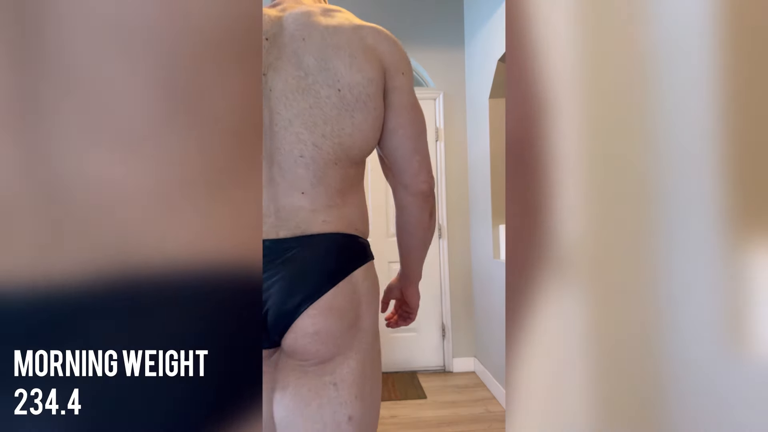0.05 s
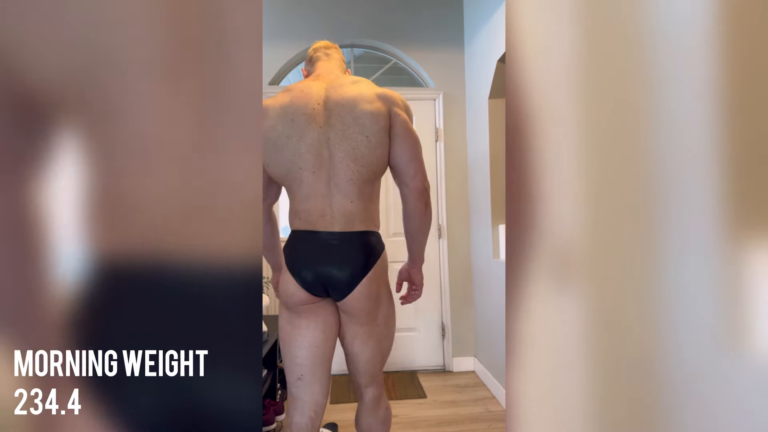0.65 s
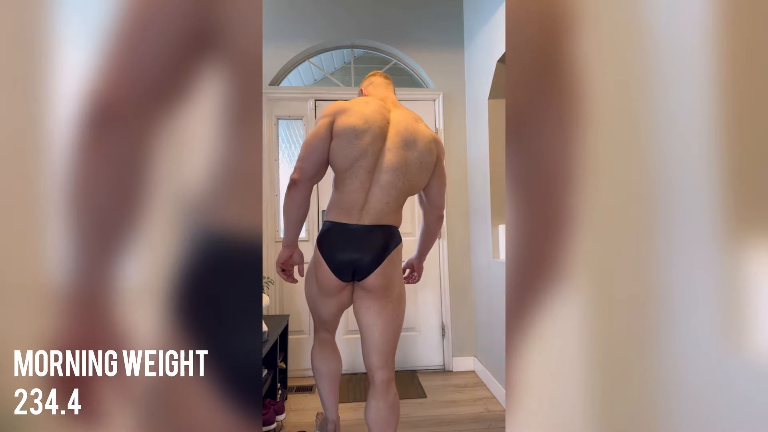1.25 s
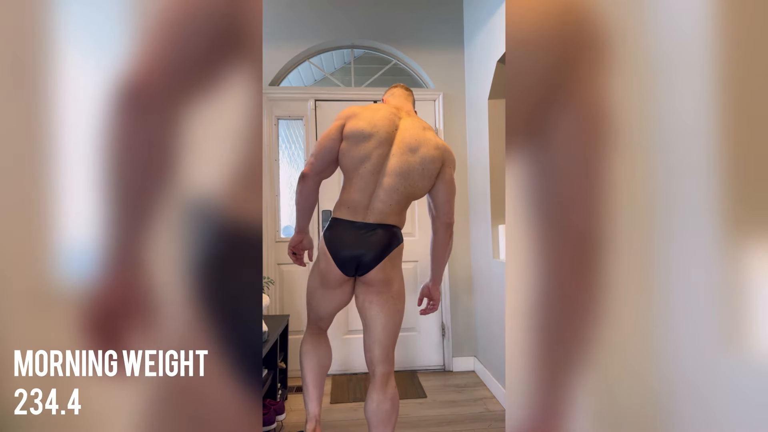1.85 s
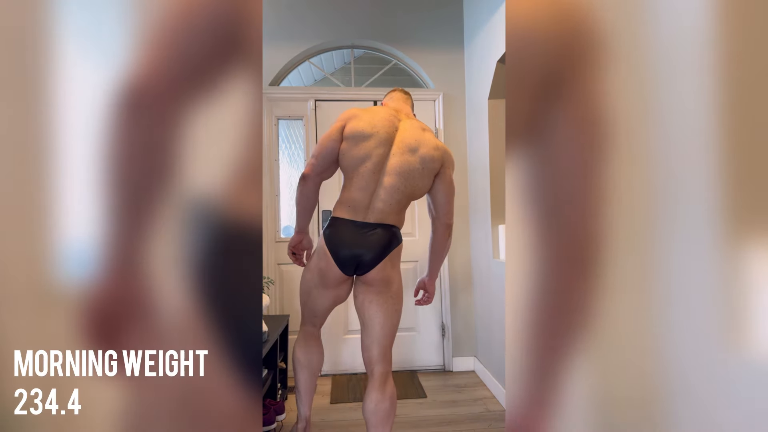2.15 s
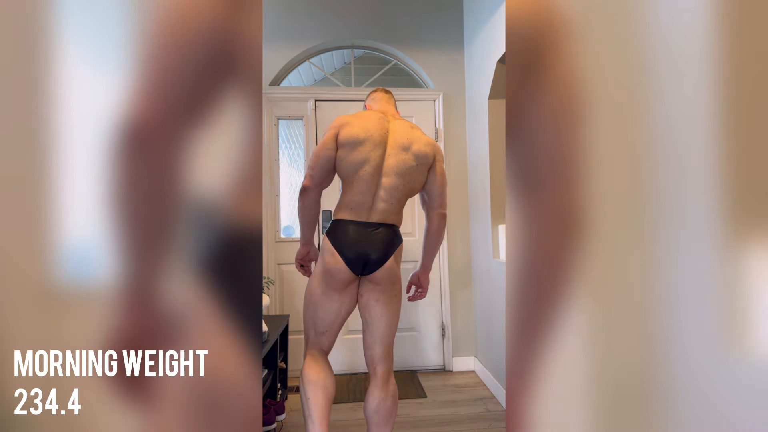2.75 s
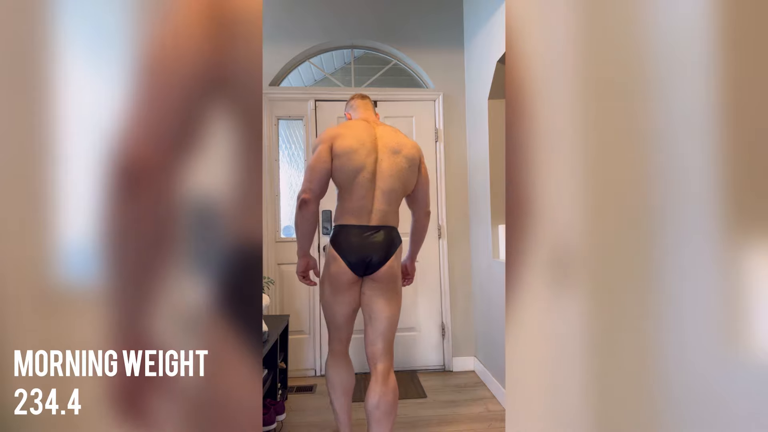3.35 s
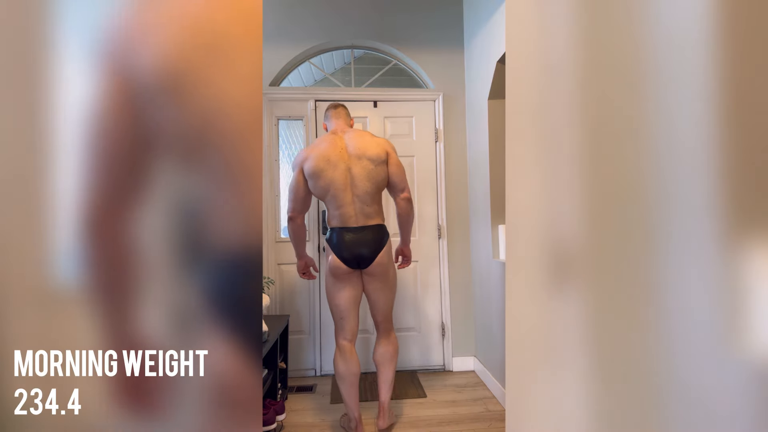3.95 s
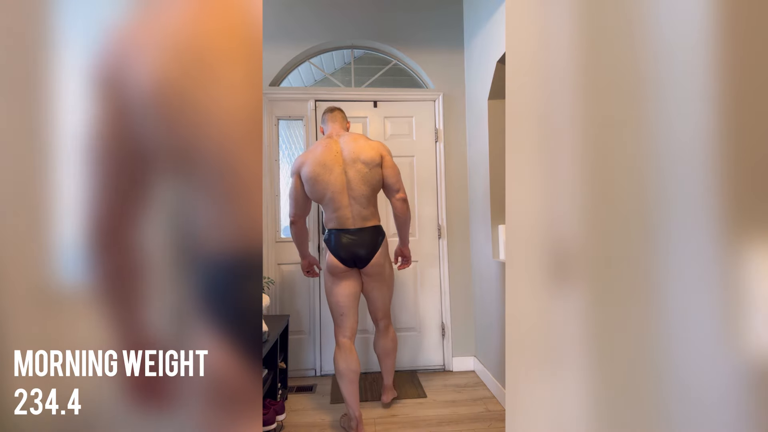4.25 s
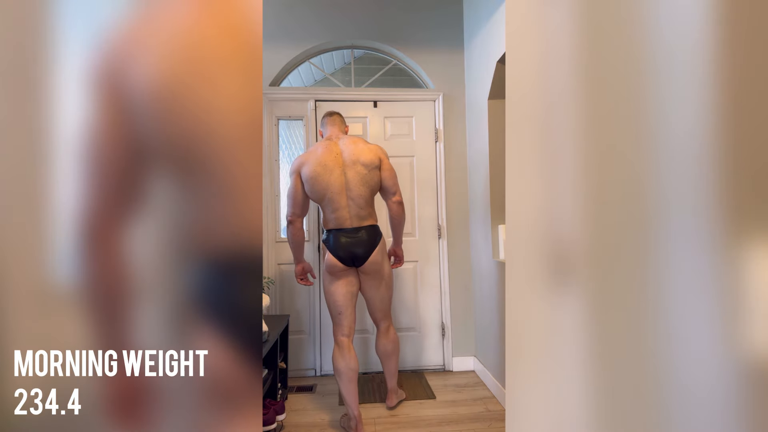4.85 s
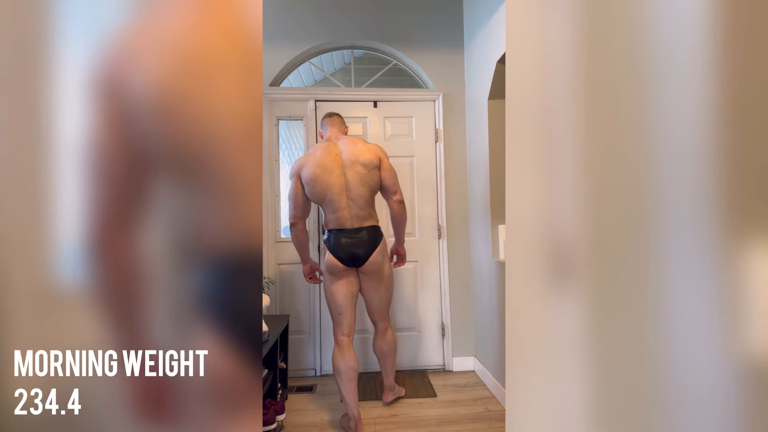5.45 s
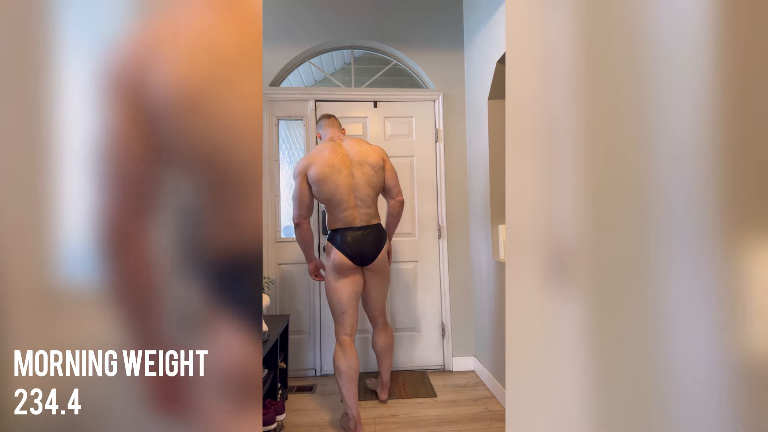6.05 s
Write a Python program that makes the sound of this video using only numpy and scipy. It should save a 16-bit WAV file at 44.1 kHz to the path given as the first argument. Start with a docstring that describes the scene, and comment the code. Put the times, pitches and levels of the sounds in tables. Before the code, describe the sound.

In a small, quiet entrance hall, bare feet step softly on a wooden floor while skin rubs close to the microphone. Soles brush and hiss over the boards between dull footfalls, and loose boards give short hollow notes. After a quick cluster of steps comes a louder sliding swish, then two short sweeps that each end on a planted heel, the second a firm stamp.

```python
"""A small entrance hall with a wooden floor, where someone walks barefoot and shuffles into a stance.
Skin rubs close to the microphone at first; soles brush and slide on the boards, and each footfall
slaps, knocks and sets the floor booming. Loose boards sound under the weight, skin ticks as it peels
away. Two slides end in a planted heel, the second a firm stamp. Behind it all is the house's still air."""
import sys
import numpy as np
from scipy import signal
from scipy.io import wavfile
from scipy.ndimage import uniform_filter1d

SR = 44100
rng = np.random.default_rng(int(sys.argv[2]) if len(sys.argv) > 2 else 0)


def transcribe(signal):
    """Save signal, clipped to [-1, 1], as a 16-bit WAV file at the path in sys.argv[1]."""
    frames = np.atleast_2d(signal).T
    limited = np.clip(frames, -1, 1)
    pcm = np.round(limited * 32767).astype(np.int16)
    wavfile.write(sys.argv[1], SR, pcm)


N = 272979
TIME = np.arange(N) / SR
EDGES = 31 * 2 ** (np.arange(28) / 3)   # third octaves, Hz
CENTRES = np.sqrt(EDGES[1:] * EDGES[:-1])
BANK = [signal.butter(2, pair, "band", fs=SR, output="sos") for pair in zip(EDGES, EDGES[1:])]
SPEED_POWER, SWEEP_POWER = 1.72, 2.73   # rubbing grows louder as a power of its speed

# The ring of the hall. Each row: frequency in Hz, seconds to die away by 60 dB.
HALL_T60 = [(60, 0.61), (150, 0.41), (600, 0.47), (2200, 0.4), (4000, 0.31), (6000, 0.27), (11000, 0.21)]
# A foot sweeps in ever faster and stops on its heel. Each row: landing in seconds, levels of thud,
# knock, slap and sweep in dB, the sweep's swell and hold in seconds.
HEEL_PLANTS = [(5.106, -47.5, -44.5, -42.5, -44, 0.37, 0.0033),
               (5.446, -33.5, -40.5, -35.5, -41, 0.13, 0.037)]


def from_db(db):
    """Decibels to gain."""
    return 10 ** (np.asarray(db) / 20)


def unit_rms(x):
    """Scale to rms 1."""
    return x / np.sqrt(np.mean(x ** 2) + 1e-20)


def at_hz(points, hz):
    """Read a table on a log-frequency axis."""
    f, value = np.transpose(points)
    return np.interp(np.log(hz), np.log(f), value)


def add(out, s, sound):
    """Mix a sound in at a given second."""
    start = max(round(s * SR), 0)
    out[start:start + len(sound)] += sound[:N - start]


def drift(rate_hz):
    """A smooth random wander with spread 1."""
    hop = 40
    pole = np.exp(-2 * np.pi * hop * rate_hz / SR)
    white = rng.standard_normal(N // hop + 2002)
    slow = signal.lfilter([1], [1, -2 * pole, pole * pole], white)[2000:]
    return np.interp(np.arange(N) / hop, np.arange(len(slow)), unit_rms(slow))


def shares(spectrum):
    """Rms of each third octave for a sound of rms 1; steep skirts beyond the table's ends."""
    octaves_beyond = np.abs(np.log2(CENTRES / np.clip(CENTRES, spectrum[0][0], spectrum[-1][0])))
    share = from_db(at_hz(spectrum, CENTRES) - 36 * octaves_beyond) * np.sqrt(CENTRES)
    return share / np.linalg.norm(share)


def friction(spectrum, grain_db, patchy_db):
    """Countless tiny uneven slips, coloured band by band as the contact patch changes; rms 1."""
    slips = rng.standard_normal((2, N)) * from_db(grain_db * np.clip(drift(120), -2, 2))
    out = np.zeros(N)
    for k, share in enumerate(shares(spectrum)):
        if share > 1e-3:
            band = unit_rms(signal.sosfilt(BANK[k], slips[k % 2]))
            out += share * band * from_db(patchy_db * drift(14.2))
    return unit_rms(out)


def stroke(start_s, swell_s, hold_s, fade_s, power):
    """Gain of one rubbing movement: the speed ramps up, holds and ramps down to rest."""
    speeding_up = (TIME - start_s) / swell_s
    slowing = 1 - (TIME - start_s - swell_s - hold_s) / fade_s
    return np.clip(np.minimum(speeding_up, slowing), 0, 1) ** power


def strokes(rows, power):
    """Gain of several movements, whose energies add."""
    return np.sqrt(sum((from_db(db) * stroke(*shape, power)) ** 2 for *shape, db in rows))


def burst(spectrum, rise_s, direct_t60, hall_db):
    """A blow's short direct sound, then the hall dying away band by band; rms near 1 for the first 30 ms."""
    t = TIME[:SR * 3 // 4]
    white, out = rng.standard_normal((2, len(t) + SR // 8)), 0
    for k, share in enumerate(shares(spectrum)):
        if share > 1e-3:
            ring = from_db(hall_db - 60 * t / at_hz(HALL_T60, CENTRES[k]))
            shape = (from_db(-60 * t / direct_t60) + ring) * (1 - np.exp(-t / rise_s))
            band = signal.sosfilt(BANK[k], white[k % 2])[-len(t):] * shape
            onset_scale = np.sqrt(np.mean(shape ** 2) / np.mean(shape[:SR // 33] ** 2))
            out += share * unit_rms(band) * onset_scale
    return out


def mode(hz, swell_s, t60, sag=0):
    """A resonance that swells under a soft push and rings out; its pitch falls by sag (share per s)."""
    t = TIME[:SR]
    tone = np.sin(2 * np.pi * hz * t * (1 - sag * t / 2))
    return tone * (1 - np.exp(-(t / swell_s) ** 2)) * from_db(-60 * t / t60)


def hall(x, wet_db):
    """Direct sound plus dense reflections from the bare walls."""
    t = TIME[:SR // 2]
    white = rng.standard_normal((2, len(t))) * (t > .004)
    tail = sum(signal.sosfilt(BANK[k], white[k % 2]) * from_db(-60 * t / at_hz(HALL_T60, hz))
               for k, hz in enumerate(CENTRES))
    return x + from_db(wet_db) * signal.fftconvolve(x, tail / np.linalg.norm(tail))[:N]


def still_air():
    """The room tone of the house: a faint, low noise that barely wavers."""
    # The air's spectrum. Each row: frequency in Hz, relative density in dB.
    air_spectrum = [(18, -51), (30, -73), (48, -3.5), (98, 5), (138, 0.5), (295, -0.5), (384, -5),
                    (499, -21), (684, -14), (760, -13.5), (2290, -27.5), (3310, -35.5), (4300, -33.5),
                    (8080, -42), (16000, -41)]
    return from_db(-61.5) * friction(air_spectrum, grain_db=.6, patchy_db=.7)


def brushing():
    """A lightly loaded sole hisses over the boards; more pressure adds a lower rasp."""
    # Passes of a sole. Each row: start, swell, hold and fade in seconds, rasp and hiss levels in dB.
    brushes = [(0, 0.004, .95, 0.45, -72, -76), (0.103, 0.12, 0.0037, 0.036, -53.5, -64),
               (0.871, 0.051, .004, .1, -68, -62), (1.305, 0.17, 0.37, 0.28, -53.5, -56.5),
               (1.777, 0.12, 0.0081, 0.3, -47.5, -62), (2.151, 0.052, 0.67, 0.33, -55.5, -54.5),
               (2.35, 0.05, .005, 0.095, -79, -48.5), (2.608, 0.17, 0.051, 0.38, -47.5, -59),
               (3.405, 0.083, 0.016, .11, -64, -73), (3.564, 0.01, 0.014, 0.24, -62.5, -81),
               (3.71, 0.057, 0.0036, 0.17, -60, -64), (5.688, 0.053, .015, 0.16, -72, -102),
               (5.904, 0.16, 0.14, .1, -93, -84)]
    # Spectra of the rasp and the hiss. Each row: frequency in Hz, relative density in dB.
    rasp_spectrum = [(150, 1.5), (300, 2), (520, -5), (800, -2.5), (1400, 0.5), (2300, 1.5), (3300, -1.5),
                     (4800, -2.5), (6500, -10), (9000, -37), (14000, -35)]
    hiss_spectrum = [(2500, -5), (5000, 3.5), (7500, 1), (10000, 5), (12300, -2.5), (15500, 3.5)]
    rasp_gain = strokes([(*shape, rasp_db) for *shape, rasp_db, _ in brushes], SPEED_POWER)
    hiss_gain = strokes([(*shape, hiss_db) for *shape, _, hiss_db in brushes], SPEED_POWER)
    rasp = rasp_gain * friction(rasp_spectrum, grain_db=2.5, patchy_db=0.8)
    hiss = hiss_gain * friction(hiss_spectrum, grain_db=0.7, patchy_db=2.5)
    return hall(rasp, wet_db=-9) + hiss


def footfalls():
    """Skin slaps first, the board knocks, and the body's weight booms in the floor a moment later."""
    # Soft steps. Each row: landing in seconds, levels of thud, knock and slap in dB.
    steps = [(0.037, -45.5, -47, -53.5), (0.063, -46.5, -47.5, -53), (0.374, -51, -48.5, -71),
             (0.67, -46.5, -47, -50), (0.726, -45, -49.5, -58), (0.791, -40.5, -41.5, -51.5),
             (1.518, -44, -46, -50), (1.6, -67, -75, -51), (1.715, -35.5, -37.5, -40),
             (2.161, -55, -59.5, -70), (2.26, -46, -47, -52.5), (2.526, -55.5, -52.5, -53),
             (3.36, -45.5, -52.5, -59), (3.372, -55, -40, -48.5), (3.489, -50, -55, -55),
             (3.578, -42.5, -45.5, -49.5), (3.644, -54, -49.5, -59.5), (3.684, -56, -54, -61.5),
             (3.745, -48, -46.5, -55)]
    # Spectra of a footfall's three parts. Each row: frequency in Hz, relative density in dB.
    slap_spectrum = [(450, 0.5), (800, 0), (1250, 4), (2000, -3), (3200, -9.5), (5500, -16), (9000, -24.5),
                     (15000, -20)]
    knock_spectrum = [(140, -47), (230, 1), (310, -5.5), (420, -8.5), (580, -15), (760, -17), (1200, -25.5)]
    thud_spectrum = [(35, -62), (60, 9.5), (110, 7.5), (190, -2.5), (260, -4.5), (420, -31)]
    # The floor's low modes. Each row: frequency in Hz, relative level in dB, seconds to fall 60 dB.
    floor_modes = [(71.8, 0, 0.61), (103, -4.5, 0.4), (126.4, 8.5, 0.25), (165.9, 0, 0.8),
                   (192.6, 2, 0.064), (241, -59, 0.44), (295, -1.5, 0.38)]
    # The attack and the slap's decay in seconds, then the hall's answer to the slap in dB.
    soft_sole, planted_heel = (0.0016, 0.099, 4), (0.00077, 0.054, -7)
    landings = [(*row, *soft_sole) for row in steps] + [(*row[:4], *planted_heel) for row in HEEL_PLANTS]
    out = np.zeros(N)
    for s, thud_db, knock_db, slap_db, attack_s, contact_s, hall_db in landings:
        slap = burst(slap_spectrum, rise_s=attack_s, direct_t60=contact_s, hall_db=hall_db)
        # the softer the sole lands, the duller its slap
        dull = signal.butter(2, 7 / attack_s, fs=SR)
        knock = burst(knock_spectrum, rise_s=attack_s, direct_t60=0.12, hall_db=3.5)
        thud = burst(thud_spectrum, rise_s=0.0095, direct_t60=0.32, hall_db=-10)
        # each spot on the floor favours other modes
        boom = sum((-1) ** k * from_db(db + rng.normal(0, 1.3)) * mode(hz, swell_s=0.015, t60=t60)
                   for k, (hz, db, t60) in enumerate(floor_modes))
        add(out, s, from_db(slap_db) * signal.lfilter(*dull, slap))
        add(out, s, from_db(knock_db) * knock)
        add(out, s + 0.003, from_db(thud_db) * thud)
        add(out, s + 0.0043, from_db(thud_db - 4) * boom)
    return out


def loose_boards():
    """Single boards give a short hollow note under load, roughened by rubbing on their neighbours."""
    # Board notes. Each row: start in seconds, pitch in Hz, level in dB, cycles to fall 60 dB.
    boards = [(0.063, 61.6, -21, 9.7), (0.183, 600, -39, 43), (0.19, 323, -32.5, 73),
              (1.518, 600, -30.5, 17.6), (1.717, 670, -26, 27), (2.261, 567, -35, 25),
              (2.266, 289, -33, 32), (3.376, 580, -31, 21), (3.491, 546, -29, 13), (3.582, 278, -34, 18),
              (3.645, 603, -34.5, 20), (3.684, 520, -44.5, 22), (3.716, 598, -40.5, 19),
              (3.813, 516, -37.5, 10.3), (4.169, 81, -45, 15), (4.46, 144, -34, 13), (5.116, 102, -21, 6.5),
              (5.185, 67.6, -36.5, 17.5), (5.457, 154.3, -16, 13.3), (5.455, 203, -25.5, 28)]
    out = np.zeros(N)
    for s, hz, db, cycles in boards:
        add(out, s, from_db(db) * mode(hz, swell_s=0.95 / hz, t60=cycles / hz, sag=.6))
    roughness = from_db(3 * np.clip(drift(220), -1.7, 1.7))
    return hall(out * roughness, wet_db=-10)


def skin_ticks():
    """Small soft snaps as skin peels off a surface, each a broad hump of noise."""
    # Skin sticking and letting go. Each row: start in seconds, level in dB, centre in Hz.
    ticks = [(0.136, -64, 11000), (0.1745, -64.5, 11000), (0.206, -72, 4000), (0.922, -63, 3780),
             (1.143, -68.5, 3400), (1.91, -52.5, 4030), (3.373, -58.5, 2300), (3.768, -55.5, 3000)]
    out = np.zeros(N)
    for s, db, hz in ticks:
        hump = [(hz / 4, -14), (hz / 2, -3), (hz, 0), (hz * 3, -12)]
        add(out, s, from_db(db) * burst(hump, rise_s=0.0025, direct_t60=0.042, hall_db=-10))
    return out


def judder(per_s, t60, steady):
    """Stick and slip: uneven jerks that swell and die quickly, on top of a steady drag; rms 1."""
    times = np.cumsum(rng.uniform(.35, 1.65, size=1200)) / per_s
    onsets = (times[times < (N - 1) / SR] * SR).astype(int)
    jerks = np.zeros(N)
    jerks[onsets] = from_db(rng.normal(0, 1.5, len(onsets)))
    dying = signal.lfilter([1], [1, -from_db(-60 / (t60 * SR))], jerks)
    # soft skin rounds the start of each jerk
    rounded = uniform_filter1d(uniform_filter1d(dying, size=70), size=70)
    return unit_rms(steady + rounded)


def close_rub():
    """Skin drags on skin close to the microphone: a smooth hiss, then a juddering rumble as it grips."""
    # Spectra of the rumble and the hiss. Each row: frequency in Hz, relative density in dB.
    rumble_spectrum = [(29, -46), (50, -15), (98, -15), (128, 4.5), (155, -12), (297, -4.5), (341, -13.5),
                       (456, -6.5), (889, -18.5), (3000, -30.5), (3900, -54), (6600, -120)]
    hiss_spectrum = [(500, -25), (1300, 7), (1800, -4), (2450, 5.5), (3300, 3), (4300, 7), (5500, -8),
                     (7500, -6.5), (9500, -28), (12300, 0), (15500, -15)]
    start_s, catch_s, tighten_s, grip_db_per_s = 0.32, 0.12, 0.51, 21
    grip = judder(per_s=75, t60=.04, steady=.5)
    load = from_db(-51.5 + grip_db_per_s * np.clip(TIME - start_s, 0, tighten_s))
    contact = stroke(start_s, swell_s=catch_s, hold_s=tighten_s - catch_s, fade_s=0.18, power=1.32)
    glide = from_db(-45) * stroke(start_s, swell_s=0.29, hold_s=0.016, fade_s=0.25, power=1.84)
    rumble = load * contact * grip * friction(rumble_spectrum, grain_db=0.5, patchy_db=1.7)
    hiss = glide * friction(hiss_spectrum, grain_db=1.5, patchy_db=2.3)
    return hall(rumble + hiss, wet_db=-8)


def sliding():
    """A loaded sole is pushed across the floor or sweeps in to land, and the hall carries the swish on."""
    # Outward shoves of the sole. Each row: start, swell, hold and fade in seconds, level in dB.
    shoves = [(4.14, .12, 0.0044, 0.082, -63), (4.295, .12, 0.033, 0.2, -37.5),
              (4.45, 0.11, 0.032, 0.17, -44), (4.64, 0.055, 0.011, 0.12, -50.5)]
    # The swish's spectrum. Each row: frequency in Hz, relative density in dB.
    swish_spectrum = [(80, -7), (200, -2), (400, -8), (800, -7.5), (1250, -0.5), (1950, 1.5), (2700, -1),
                      (3500, -4.5), (5500, -11.5), (7200, -20.5), (10000, -21.5), (12500, -26.5),
                      (15500, -27)]
    stop_s = 0.036   # the landing ends the sweep
    sweeps = [(landing_s - hold_s - swell_s, swell_s, hold_s, stop_s, db)
              for landing_s, *_, db, swell_s, hold_s in HEEL_PLANTS]
    gain = strokes(shoves, SPEED_POWER) + strokes(sweeps, SWEEP_POWER)
    return hall(gain * friction(swish_spectrum, grain_db=1.0, patchy_db=0.3), wet_db=-11.5)


def scene():
    """Feet and skin over the steady quiet of the house, in mono."""
    mix = still_air() + brushing() + footfalls() + loose_boards() + skin_ticks() + close_rub() + sliding()
    return mix[None]


def record(dry):
    """The small microphone loses the deepest bass; the top is cut steeply."""
    low_cut_hz, high_cut_hz = 32, 15900
    thin = signal.sosfilt(signal.butter(2, low_cut_hz, "high", fs=SR, output="sos"), dry)
    return signal.sosfilt(signal.ellip(12, .1, 70, high_cut_hz, fs=SR, output="sos"), thin)


dry = scene()
out = record(dry)
transcribe(out)
```